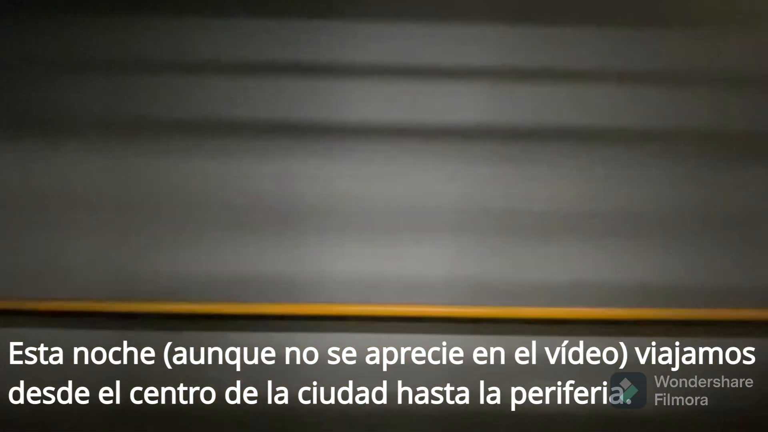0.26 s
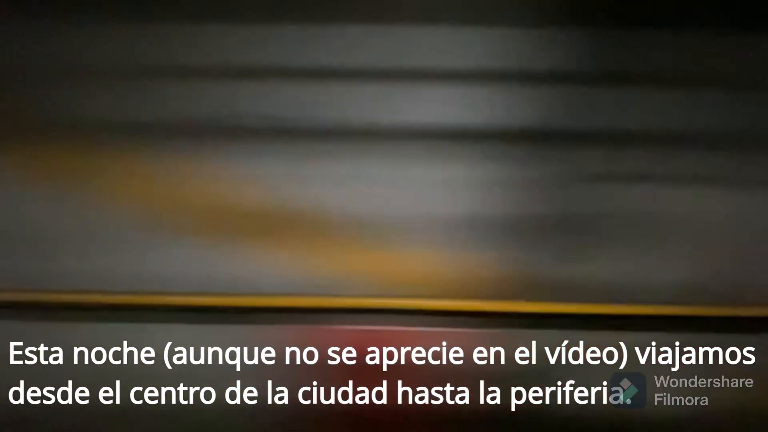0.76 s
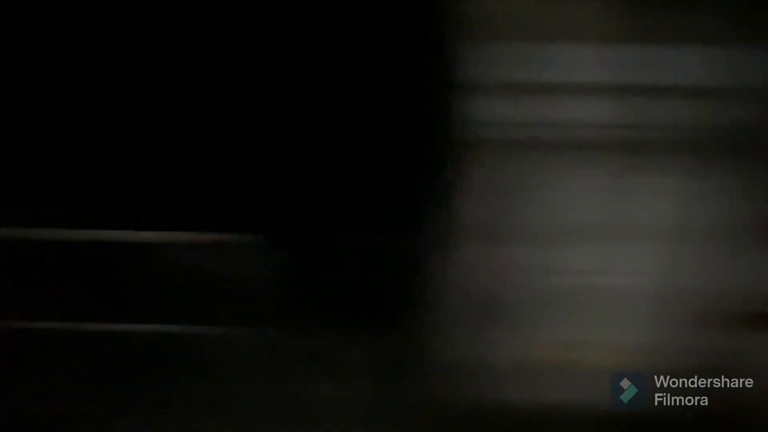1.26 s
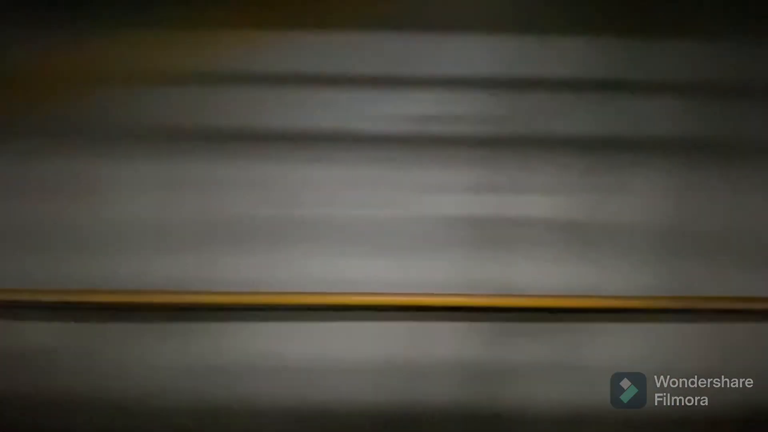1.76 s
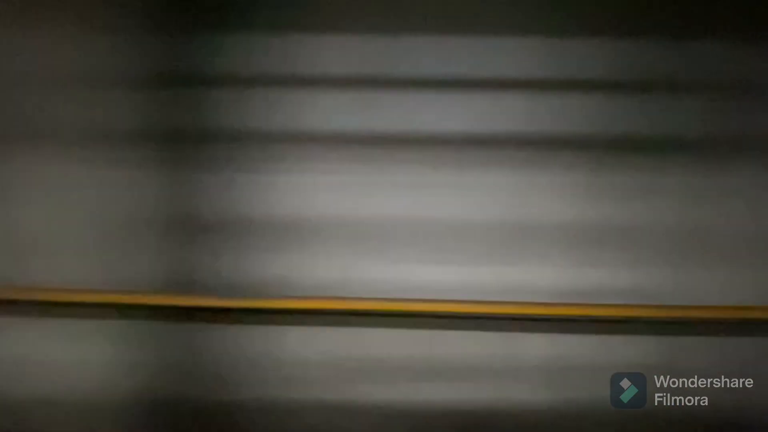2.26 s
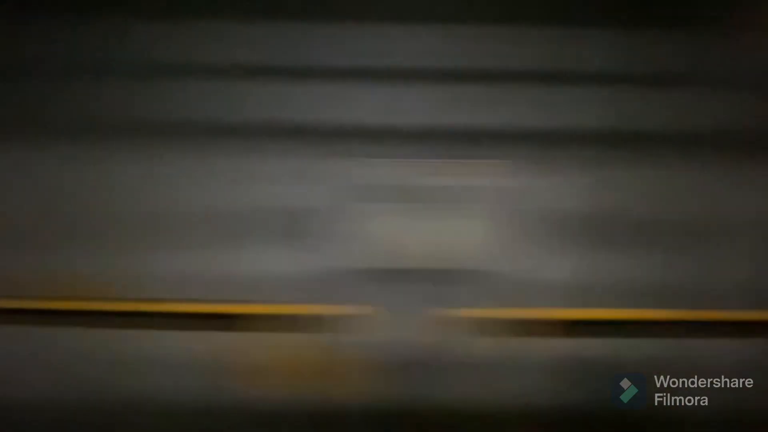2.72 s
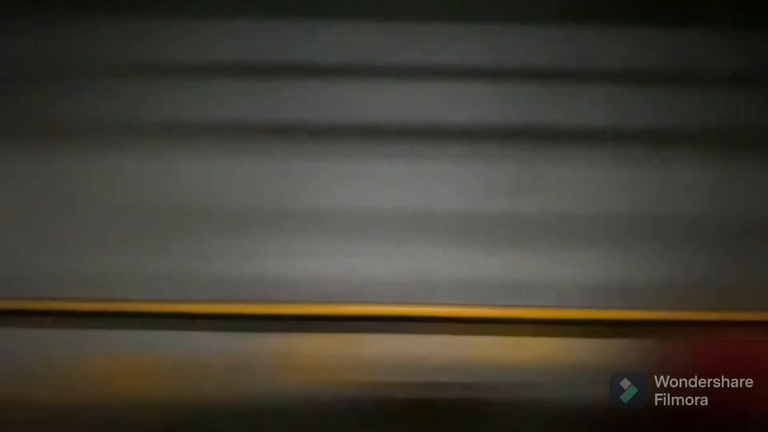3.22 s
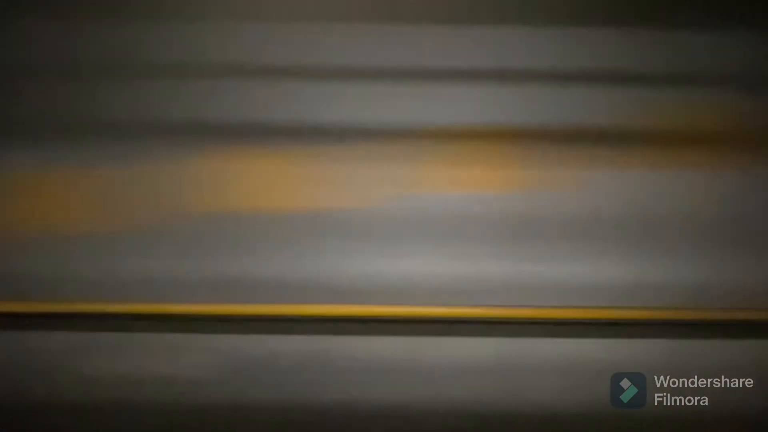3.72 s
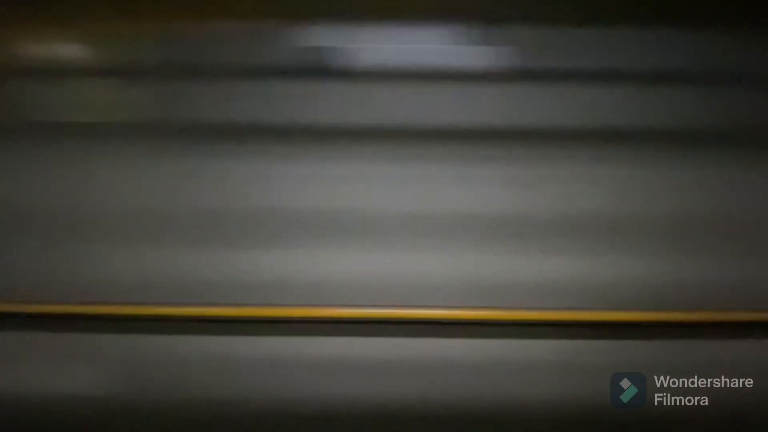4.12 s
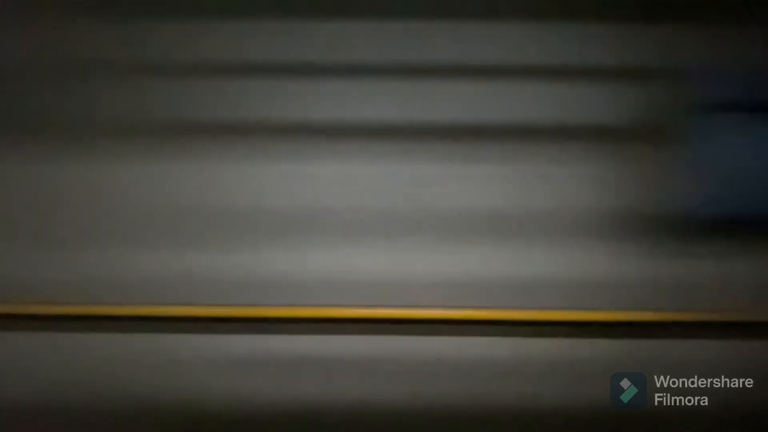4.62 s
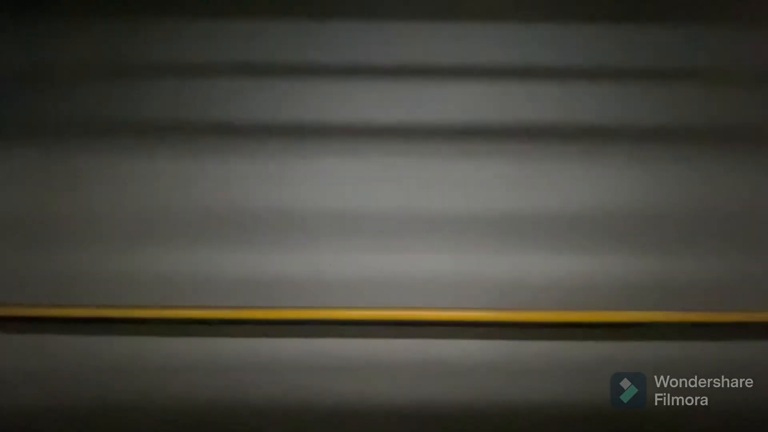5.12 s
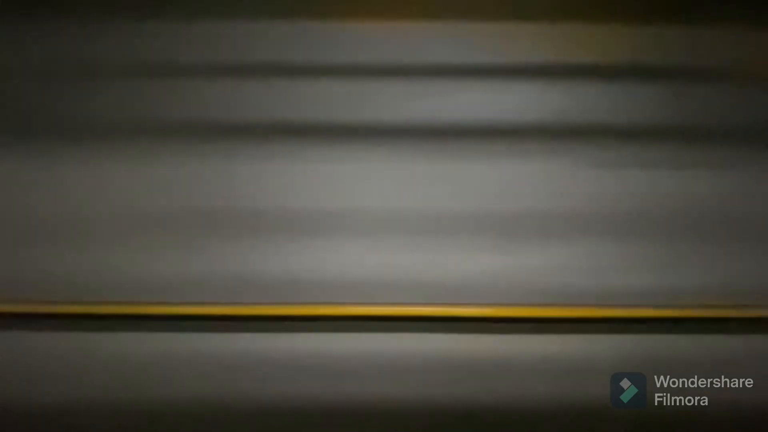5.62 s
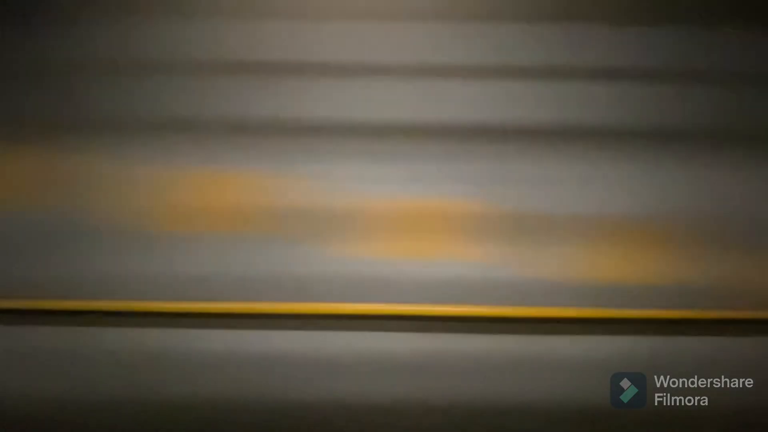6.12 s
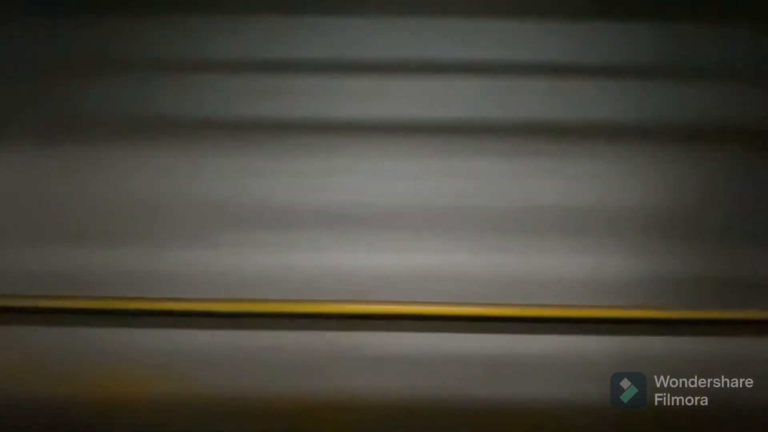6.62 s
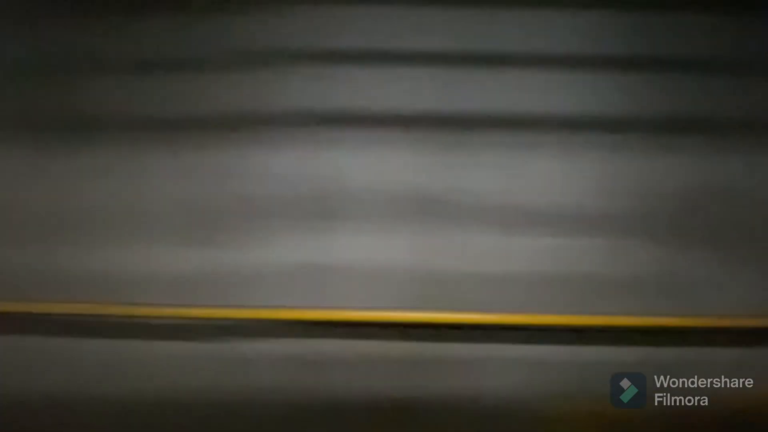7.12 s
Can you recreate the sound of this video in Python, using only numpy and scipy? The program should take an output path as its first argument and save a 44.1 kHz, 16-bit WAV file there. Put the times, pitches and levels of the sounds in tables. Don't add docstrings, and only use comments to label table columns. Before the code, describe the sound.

Continuous heavy rumble and mid-low roar of a fast subway train heard from inside, its resonances shifting, with a brief thin wheel squeak near the end.

```python
import sys
import numpy as np
from scipy import signal
from scipy.fft import irfft, next_fast_len
from scipy.io import wavfile
from scipy.ndimage import uniform_filter1d, map_coordinates

SR = 44100
rng = np.random.default_rng(int(sys.argv[2]) if len(sys.argv) > 2 else 0)


def persist_wave(psi):
    counts = np.round(np.clip(psi, -1, 1) * 32767).astype(np.int16)
    wavfile.write(sys.argv[1], SR, np.atleast_2d(counts).T)


def convert_level_to_amplitude(level_db):
    exponent = np.asarray(level_db, float) / 20
    return 10 ** exponent


N = 325017
SIZE = next_fast_len(N)
HZ = np.arange(SIZE // 2 + 1) * SR / SIZE + 1e-9
TIME = np.arange(N) / SR


def on_log_hz(table):
    hz, value = np.transpose(table)
    return np.interp(np.log(HZ), np.log(hz), value)


def in_time(table):
    s, *columns = np.transpose(table)
    return [np.interp(TIME, s, c) for c in columns]


def mode(hz, width_hz):
    return 1 / np.sqrt(1 + ((HZ - hz ** 2 / HZ) / width_hz) ** 2)


def walk(rate_hz):
    hold = int(SR / rate_hz)
    points = rng.standard_normal(N // hold + 2)
    slopes = np.interp(TIME * rate_hz, np.arange(N // hold + 2), points)
    return 1.4 * uniform_filter1d(slopes, hold)


def surges(table):
    return sum(db * np.exp(-((TIME - s) / length_s * 2) ** 2) for s, length_s, db in table)


# start in seconds, long-wave unevenness in dB,
# rail corrugation 0-1, nearness of the tunnel wall in dB.
TRACK = [(0, 4, 0.65, 3), (.3, 4.5, 0.07, 3.5), (.6, 6, 0, 2.5), (.9, -0.5, 0.07, -1), (1.6, 3, 0.25, 0.5),
         (2.1, 1.5, 0, -1.5), (2.7, 2, 0.46, -0.5), (3.15, -1.5, 0.94, 2), (3.6, -3, 0.84, 1.5),
         (4.1, -2, 0.76, 1.5), (4.6, -3.5, 0.46, 2), (5.0, -2.5, 0.25, 1), (5.4, -4.5, 0.26, 3),
         (5.8, 0, 0, 2.5), (6.2, -1.5, 0.45, 1), (6.6, -2.5, -.1, -1), (7.0, -1.5, 0.28, -0.5),
         (7.37, -3.5, 0.07, -3)]
OPENING_S, OPENING_LENGTH_S = 1.21, 0.62


def answers(table):
    uneven_db, ripple, wall_db = in_time(TRACK)
    opening = surges([(OPENING_S, OPENING_LENGTH_S, 1)])
    return [db + a * uneven_db + b * ripple + c * wall_db + d * opening for db, a, b, c, d in table]


# Hz, likeness of the ports 0-1, lag of left in rad.
PORTS = [(40, .94, 0), (140, .88, .05), (195, .5, .05), (280, .86, .2), (450, .12, .7), (680, .45, 3.1),
         (840, .3, 1.3), (1250, .4, 1.0), (1750, .45, 3.0), (2200, .45, 3.7), (2600, .67, 5.9),
         (3100, .52, 6.2), (3600, .68, 9.0), (4200, .44, 9.6)]
# Hz, likeness, negative for opposite sign [-1 to 1].
TREBLE_LIKENESS = [(4300, -.3), (4620, .68), (5200, .05), (5800, -.38), (7000, .35), (8150, -.37), (8600, .1),
                   (9200, -.47), (10500, .75), (12200, .9), (12500, -.97), (13700, -.97), (13800, -1)]


def ports():
    hz, like, lag_rad = np.transpose(PORTS)
    cabin = np.interp(HZ, hz, like) * np.exp(1j * np.interp(HZ, hz, lag_rad))
    return np.where(HZ < hz[-1], cabin, np.interp(HZ, *np.transpose(TREBLE_LIKENESS)))


def shaken(gain, like, tilt, top_hz=13850):
    chance = rng.standard_normal((2, len(HZ), 2), dtype=np.float32)
    a, b = chance[..., 0] + 1j * chance[..., 1]
    right = like * a + np.sqrt(1 - np.abs(like) ** 2) * b
    spectra = np.array([a * tilt, right / tilt]) * gain * (HZ < top_hz)
    pair = irfft(spectra, SIZE)[:, :N]
    return pair / np.sqrt(np.mean(pair ** 2))


# Hz, width in Hz.
SHELL_MODES = [(78, 23), (272, 55), (331, 44.6), (392, 47)]
# level in dB, dB per dB of unevenness, dB on corrugation,
# dB per dB of wall, dB at the opening.
SHELL_ANSWER = [(-45.5, 1.05, -4, 0.1, 0), (-18.5, 0.5, -7, -0.03, 0.5), (-21.5, 0.03, 4.5, -0.53, -8.5),
                (-27, 1.2, 3, -0.76, -1.5)]
# centre in seconds, length in seconds, change in dB.
BODY_SURGES = [
    (.95, .3, 7),
    (1.75, .15, 8),
    (2.2, .2, 7.5),
    (2.8, .35, -4.5),
    (4.05, .4, -7),
    (4.5, .15, 10),
    (5.25, .2, 4),
    (6.5, .2, -3),
]
FLOOR_SURGES = [(.43, 0.16, 1.5), (.66, 0.093, 3.5), (1.405, 0.068, -12), (2.205, 0.42, -3.5),
                (2.738, 0.1, 4), (3.403, .4, 0), (3.848, .3, -1.5), (4.85, 0.15, 0), (5.0, 0.087, 4.5),
                (5.25, .2, -5), (6.55, 0.24, 0.5), (3.65, .15, -2), (4.4, 0.25, 2), (7.044, 0.12, -5)]
CABIN_SURGES = [(1.35, 0.11, 8.5), (1.75, .2, 0), (2.8, 0.14, -4.5), (3.3, 0.059, 3), (3.55, 0.18, 2),
                (3.8, 0.064, 0), (3.95, 0.16, 3.5), (4.3, 0.23, 0.5), (4.85, .25, 0.5), (5.45, 0.082, 7.5),
                (6.15, 0.16, -3), (2.2, 0.31, -2.5), (7.05, 0.16, -6), (.75, .2, 0.5), (6.58, .2, -1.5),
                (5.12, 0.25, -2)]
ROOF_SURGES = [(.3, .2, 3), (.7, 0.138, -3.5), (1.4, 0.55, 3), (1.78, 0.059, 6), (2.3, .15, 3),
               (2.68, 0.162, 3.5), (3.45, .2, 0.5), (1.97, 0.184, -9), (2.95, 0.3, 4), (4.88, .2, 3),
               (5.12, .2, -10), (6.58, 0.18, -2), (3.63, 0.29, 4.5), (4.0, 0.184, -6), (5.6, 0.233, 6),
               (6.85, 0.1, 7.5), (7.15, .15, 4.5), (6.6, .1, -1)]


def shell(ears):
    patches = BODY_SURGES, FLOOR_SURGES, CABIN_SURGES, ROOF_SURGES
    out = 0
    levels = [db + surges(s) for db, s in zip(answers(SHELL_ANSWER), patches)]
    for db, (hz, width_hz) in zip(levels, SHELL_MODES):
        out = out + convert_level_to_amplitude(db + 0.41 * walk(5)) * shaken(mode(hz, width_hz) ** 2, *ears)
    return out


# Hz, width in Hz, trim in dB.
BOGIE_MODES = [(172, 96, -2.5), (524, 123, -1.5), (623, 125, -4.5), (798.1, 75, -3)]
# level in dB, dB per dB of unevenness, dB on corrugation,
# dB per dB of wall, dB at the opening.
BOGIE_ANSWER = [(-34, -0.0019, 0.2, 0.5, 8.5), (-27, .7, -3.5, -0.15, 1.8), (-32.5, -0.85, 1, 2.5, -2),
                (-28.5, 0.28, -6, 0.57, 2.5)]
# centre in seconds, length in seconds, change in dB.
FRAME_SURGES = [
    (.6, 0.23, -7),
    (1.55, .15, 3),
    (2.7, .2, 3),
    (3.0, 0.32, 6),
    (4.05, 0.13, -2),
    (5.75, 0.28, -4.5),
    (6.55, 0.14, -1),
]
RAIL_SURGES = [(.1, .15, 2.5), (.52, 0.14, 4), (.78, 0.19, 6), (1.15, 0.22, 1.5), (2.1, 0.19, 2),
               (2.3, 0.32, 4), (4.55, .2, 1.5), (5.0, 0.13, -2), (4.05, .3, -4), (4.87, .15, 7.5),
               (5.25, .25, 4), (1.05, 0.19, 5)]
AXLE_SURGES = [(.25, .15, 5), (.5, .2, 0.5), (1.05, .4, 3.5), (1.95, 0.135, -8), (2.25, .15, -2.5),
               (2.65, .15, -3), (3.15, .15, 1.5), (4.3, 0.24, -4), (5.75, .15, -1), (6.15, 0.21, 7.5),
               (6.65, 0.16, 2), (7.15, 0.13, 4)]
WHEEL_SURGES = [(.4, 0.21, 6.5), (.65, 0.13, 5), (.9, .15, -7), (1.1, .25, 3), (1.8, 0.34, -5),
                (2.1, 0.15, 4), (2.5, 0.17, 3), (3.3, 0.4, -3), (4.3, 0.53, 0.5), (5.3, .4, 3),
                (5.8, 0.22, -2), (6.9, 0.48, 1), (1.25, 0.14, -4), (5.92, 0.27, -7), (6.15, .12, 1)]
WEB_SURGES = [(.2, 0.18, 10), (.75, .15, 3.5), (1.15, 0.26, 9.5), (1.45, 0.16, 8.5), (1.8, 0.25, -12),
              (2.15, 0.22, 9.5), (2.55, 0.18, 8), (3.5, 0.74, 3), (2.77, 0.16, -11), (4.7, .2, 7.5),
              (6.05, .15, -6), (6.4, 0.24, -12)]
WEB_HZ, WEB_WIDTH_HZ, WEB_DB = 1035, 82, -39


def bogie(ears):
    patches = FRAME_SURGES, RAIL_SURGES, AXLE_SURGES, WHEEL_SURGES
    levels = [db + surges(s) for db, s in zip(answers(BOGIE_ANSWER), patches)]
    out = convert_level_to_amplitude(WEB_DB + surges(WEB_SURGES)) * shaken(mode(WEB_HZ, WEB_WIDTH_HZ) ** 2, *ears)
    for db, (hz, width_hz, trim_db) in zip(levels, BOGIE_MODES):
        out = out + convert_level_to_amplitude(db + trim_db + 1.5 * walk(6)) * shaken(mode(hz, width_hz) ** 2, *ears)
    return out


PLAY_S, PLAY_RATE_HZ = .007, 2.5


def shifting(pair):
    late = (TIME + PLAY_S * walk(PLAY_RATE_HZ)) * SR
    return np.array([map_coordinates(p, [late], mode="mirror") for p in pair])


# Hz, density in dB per Hz.
ROAR = [(30, -25), (50, -10.5), (110, -19), (180, -19), (220, 0), (300, -1), (460, -4.5), (700, -6.5),
        (900, -6.5), (1300, -13), (1500, -21.5), (2000, -42), (4000, -77)]
WHINE = [(800, -27.5), (1300, -2.5), (1500, 2.5), (1700, -7.5), (2000, -21), (3500, -53.5), (6000, -74.5)]
HISS = [(1000, -39), (1700, -20), (2100, -19), (2450, -28), (2900, -32), (3250, -30), (3650, -39.5),
        (4200, -37), (4700, -40), (5500, -42), (6400, -45.5), (7500, -47), (8500, -61.5), (11000, -88),
        (14000, -120)]
AIR = [(5000, -32), (7600, -5), (8400, 0), (8950, -1.5), (9400, -2.5), (10400, -8.5), (12200, -14),
       (13000, -10.5), (13600, -14), (13900, -23.5)]
# Hz, width in Hz, height in dB.
ROAR_PEAKS = [(1023, 63, 3), (1259, 54, 4.5)]
# level in dB, dB per dB of unevenness, dB on corrugation,
# dB per dB of wall, dB at the opening.
ROLL_ANSWER = [(-29, 0.44, 1, 0.44, 0.47), (-38.5, -0.8, -6, .1, .1), (-40.5, 0.11, 0, 0.46, 0.44),
               (-65, 0.22, 0.5, 0.25, .6)]
# centre in seconds, length in seconds, change in dB.
WHINE_SURGES = [
    (0.17, .15, 0),
    (0.96, .2, -1),
    (3.7, .3, 1.5),
    (7.1, .2, 3),
    (6.55, .3, 5.5),
    (7.038, .6, 3.5),
    (6.45, 0.13, -13.5),
    (5.35, .15, 0),
    (1.8, .2, -1),
]
HISS_SURGES = [(.15, .15, 0.85), (.65, 0.23, 1.1), (1.1, 0.19, 1.8), (1.45, .15, 0.55), (2.0, .15, 0.17),
               (2.55, 0.22, 1.7), (3.05, 0.18, -0.055), (4.05, .15, 0.28), (4.65, 0.22, 1),
               (5.2, .25, -0.41), (5.9, 0.132, -0.084), (6.5, 0.155, 0.27)]


def rolling(ears):
    roar_db, whine_db, hiss_db, air_db = answers(ROLL_ANSWER)
    webs_db = sum(db * mode(hz, width_hz) ** 2 for hz, width_hz, db in ROAR_PEAKS)
    roar = convert_level_to_amplitude(roar_db + 5.5 + .5 * walk(6)) * shaken(convert_level_to_amplitude(on_log_hz(ROAR) + webs_db), *ears)
    whine_db = whine_db - 2.0 + surges(WHINE_SURGES) + .5 * walk(6.8)
    whine = convert_level_to_amplitude(whine_db) * shaken(convert_level_to_amplitude(on_log_hz(WHINE)), *ears)
    gusts_db = .6 * walk(9) + surges(HISS_SURGES)
    hiss = convert_level_to_amplitude(hiss_db + 1.5 + gusts_db) * shaken(convert_level_to_amplitude(on_log_hz(HISS)), *ears)
    air = convert_level_to_amplitude(air_db + 1.1 * gusts_db + 0.5 * walk(7.1)) * shaken(convert_level_to_amplitude(on_log_hz(AIR)), *ears)
    return roar + whine + hiss + air


SLEEPER_HZ, SLEEPER_WIDTH_HZ, SLEEPER_DB, SLEEPER_SAG_DB_PER_S = 78, 10, -36, -2
SLEEPER_START_S, SLEEPER_END_S, SLEEPER_FADE_S = 0.4, 4.3, 0.14
SING_HZ, SING_WANDER_HZ, SING_DB = 330.06, 6.4, -25.5
SING_LAG_RAD, SING_LEFT_DB, SING_FLUTTER_DB = .3, -1.5, 2


def hums(ears):
    inside_s = np.minimum(TIME - SLEEPER_START_S, SLEEPER_END_S - TIME)
    gate = np.clip(inside_s / SLEEPER_FADE_S + 1, 0, 1)
    sleeper_level = gate * convert_level_to_amplitude(SLEEPER_DB + SLEEPER_SAG_DB_PER_S * TIME)
    sleepers = sleeper_level * shaken(mode(SLEEPER_HZ, SLEEPER_WIDTH_HZ) ** 2, *ears)
    ripple = np.clip(in_time(TRACK)[1], 0, 2)
    phase = 2 * np.pi * np.cumsum(SING_HZ + SING_WANDER_HZ * walk(16)) / SR
    side = np.array([[.5], [-.5]])
    db = SING_DB + surges(CABIN_SURGES) + SING_FLUTTER_DB * walk(18) + side * SING_LEFT_DB
    sing = ripple * convert_level_to_amplitude(db) * np.sqrt(2) * np.sin(phase - side * SING_LAG_RAD)
    return sleepers + sing


# centre in seconds, length in seconds, change in dB.
BED_SURGES = [(.35, 0.134, -6), (1.05, 0.37, 14), (1.4, .2, -7), (2.35, .15, 5), (2.6, .2, -11),
              (3.3, .3, 2), (4.4, 0.224, 3), (5.1, .2, -6), (5.75, .15, -6), (6.5, 0.377, -5.5),
              (6.85, 0.16, 4.5)]
BED_HZ, BED_WIDTH_HZ, BED_DB = 120, 72, -45.5


def bed(ears):
    return convert_level_to_amplitude(BED_DB + surges(BED_SURGES)) * shaken(mode(BED_HZ, BED_WIDTH_HZ) ** 2, *ears)


# start in seconds, rise in seconds, hold in seconds, t60 in seconds,
# Hz, peak in dB.
SQUEAKS = [
    (6.365, .04, .075, .3, 7450, -50),
    (6.39, .06, .07, .22, 7220, -56),
    (6.475, .02, .04, .2, 4300, -61),
    (6.44, .05, .02, .15, 6750, -64),
    (6.36, .02, .04, .2, 6150, -66),
    (3.23, .015, .07, .15, 8950, -70),
    (5.8, .02, .06, .15, 8900, -72),
    (6.45, .05, .08, .7, 7250, -67),
    (6.35, .02, .03, .15, 4500, -63),
    (6.48, .02, .04, .2, 4560, -60),
]
SQUEAK_WIDTH, SQUEAK_TOP, SQUEAK_LEFT_DB = .027, 1.022, 5.0


def squeaks(ears):
    out = 0
    for s, rise_s, hold_s, t60_s, hz, db in SQUEAKS:
        swell = np.clip((TIME - s) / rise_s, 0, 1) ** 2
        tail = convert_level_to_amplitude(-60 * np.clip(TIME - s - rise_s - hold_s, 0, 9) / t60_s)
        band = mode(hz, SQUEAK_WIDTH * hz) ** 2 * (HZ < SQUEAK_TOP * hz)
        out = out + convert_level_to_amplitude(db) * swell * tail * shaken(band, *ears)
    return out * convert_level_to_amplitude(np.array([[.5], [-.5]]) * SQUEAK_LEFT_DB)


# start in seconds, length in seconds, level in dB, Hz.
PUFFS = [(0.027, 0.032, -85, 14100), (0.139, 0.166, -82, 14400), (0.38, 0.34, -77, 14600),
         (0.773, 0.3, -83, 14500), (1.22, 0.032, -85, 14600), (1.316, 0.27, -82, 14900),
         (1.619, 0.072, -82, 14600), (1.719, 0.114, -84, 14300), (1.917, 0.198, -81, 14300),
         (2.779, 0.038, -81, 14100), (3.148, 0.068, -83, 14100), (3.894, 0.038, -82, 14100),
         (3.974, 0.056, -81, 14100), (4.471, 0.04, -86, 14800), (4.549, 0.168, -83, 14500),
         (4.786, 0.046, -82, 14400), (4.896, 0.038, -82, 14600), (5.091, 0.058, -84, 14100),
         (5.175, 0.07, -84, 14700), (5.415, 0.07, -84, 14700), (5.536, 0.04, -84, 14500),
         (5.618, 0.076, -83, 14200), (5.718, 0.27, -83, 14300), (5.99, .26, -83, 15000),
         (3.47, .04, -83, 14000), (3.59, .04, -82, 14000), (1.1, .12, -83, 15000),
         (6.267, 0.23, -86, 14500), (6.542, 0.056, -84, 14600), (6.79, 0.076, -83, 14300),
         (7.137, 0.152, -84, 14500)]
PUFF_LIKENESS, PUFF_EDGE_S = .99, .012
SLITS_HZ, SLIT_WIDTH_HZ, SLIT_REACH_HZ = (14000, 14400, 14900), 480, 720
LOOSE_SPANS_S, LOOSE_DB = [(0, 2.1), (4.5, 7.37)], -89


def puff_gate(s, length_s):
    end = s + length_s
    return np.interp(TIME, [s, s + PUFF_EDGE_S, end - PUFF_EDGE_S, end], [0, 1, 1, 0])


def seal(ears):
    loose = sum((TIME > start) & (TIME < end) for start, end in LOOSE_SPANS_S)
    gates = [puff_gate(s, length_s) for s, length_s, *_ in PUFFS]
    out = 0
    for slit_hz in SLITS_HZ:
        puffs = 0
        for gate, (_, _, db, hz) in zip(gates, PUFFS):
            share = max(1 - abs(hz - slit_hz) / SLIT_REACH_HZ, 0)
            puffs = puffs + convert_level_to_amplitude(db) * share * gate
        flutter = walk(32)
        flow = puffs * np.clip(2 * flutter + 1.1, 0, 1)
        flow = flow + loose * convert_level_to_amplitude(LOOSE_DB) * np.clip(3 * (flutter - 1.1), 0, 1)
        band = np.abs(HZ - slit_hz) < SLIT_WIDTH_HZ / 2
        out = out + uniform_filter1d(flow, size=200) * shaken(band, PUFF_LIKENESS, ears[1], SR)
    return out


# Hz, left minus right in dB.
LEFT_DB = [(100, 0.5), (200, 2), (350, 2.5), (520, -0.3), (800, 3.5), (1200, 4), (2000, 2), (2500, 1.5),
           (3200, 3), (3700, 2), (4600, 3.5), (6500, 4.5), (8500, -0.5)]


def scene():
    ears = ports(), convert_level_to_amplitude(on_log_hz(LEFT_DB) / 2)
    body, rings = shell(ears), bogie(ears)
    rest = rolling(ears) + hums(ears) + bed(ears) + squeaks(ears) + seal(ears)
    return body + rest + shifting(rings)


def top_cut(x):
    return signal.sosfilt(signal.butter(12, 15800, fs=SR, output="sos"), x)


def record(dry):
    ceiling = 1.05
    soft = dry / (1 + (np.abs(dry) / ceiling) ** 6) ** (1 / 6)
    return top_cut(soft)


dry = scene()
out = record(dry)
persist_wave(out)
```